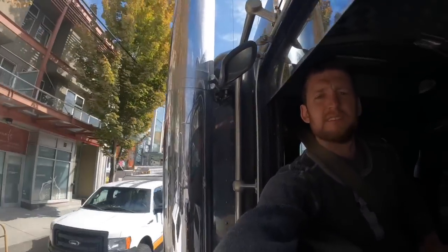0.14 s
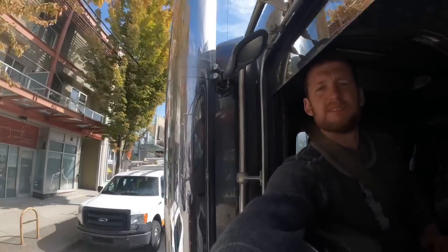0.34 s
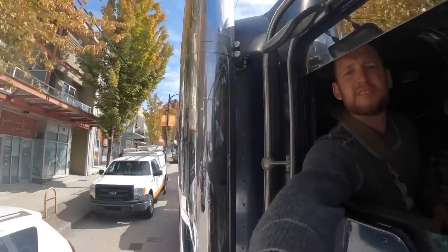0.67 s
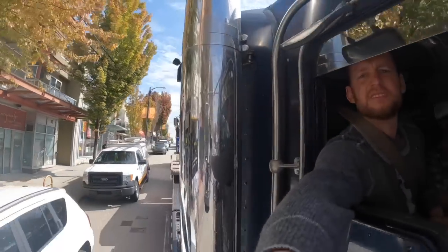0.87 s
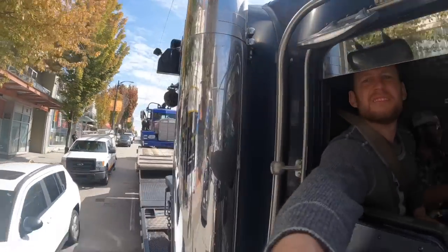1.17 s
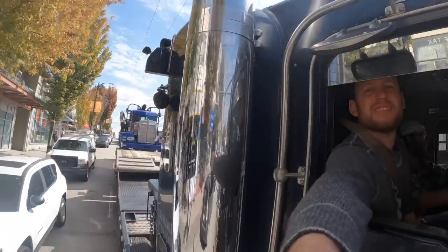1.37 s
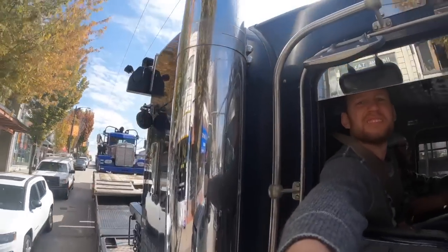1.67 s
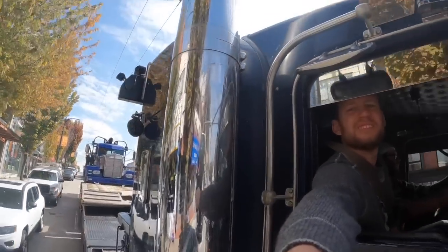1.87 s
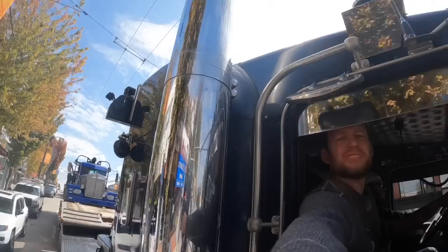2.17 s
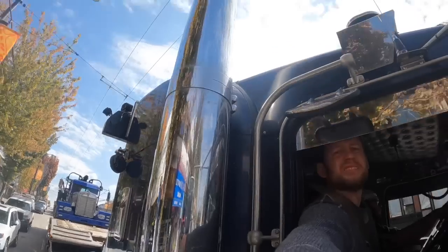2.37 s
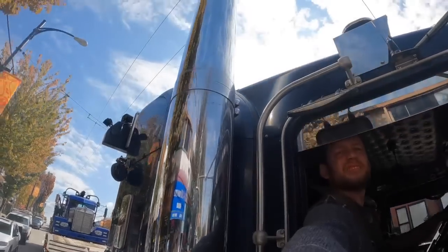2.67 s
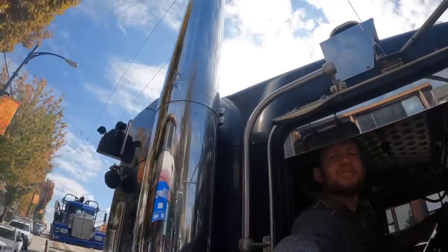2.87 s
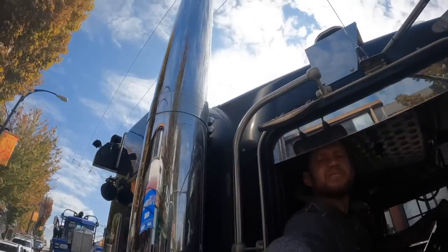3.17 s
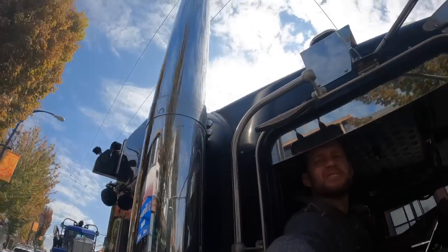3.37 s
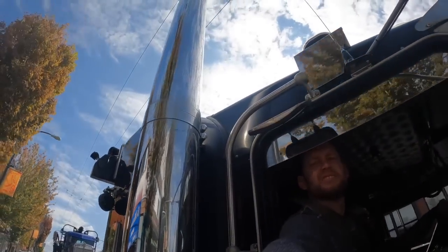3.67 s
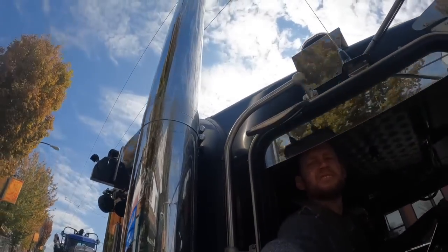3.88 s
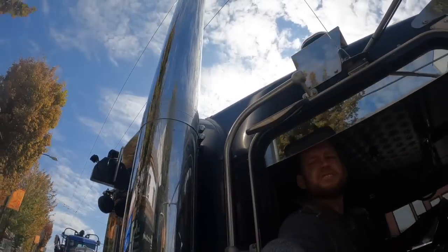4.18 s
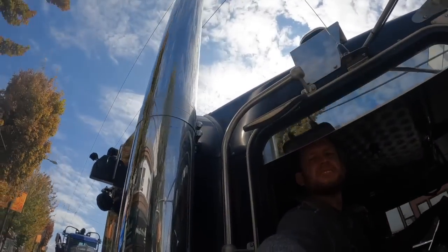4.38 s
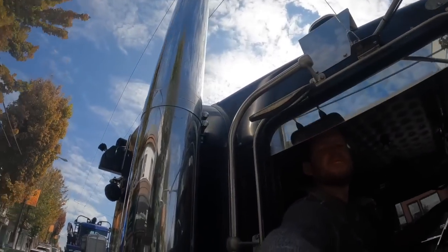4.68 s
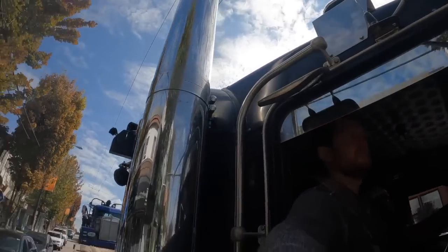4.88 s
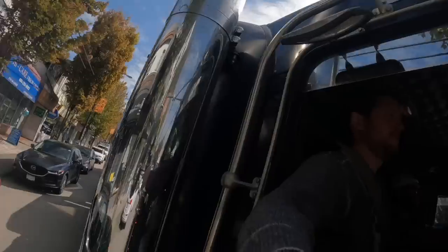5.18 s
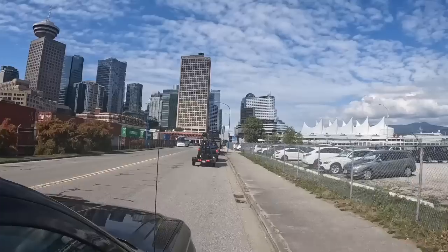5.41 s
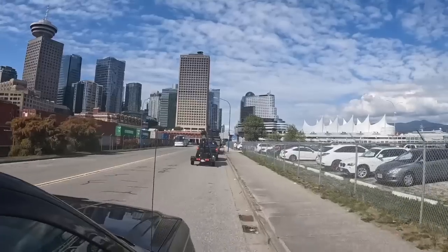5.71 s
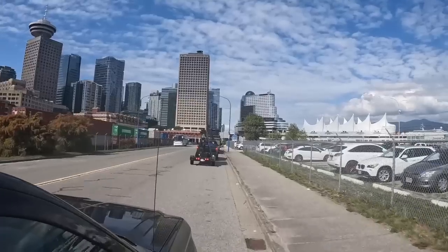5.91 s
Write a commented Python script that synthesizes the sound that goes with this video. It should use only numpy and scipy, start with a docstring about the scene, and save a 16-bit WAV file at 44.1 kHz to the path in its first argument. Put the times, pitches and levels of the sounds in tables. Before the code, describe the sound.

Close at the exhaust pipe, a heavy truck rattles out harsh brake barks around a deep accelerating roar, before an abrupt quiet drive.

```python
"""Diesel truck with engine brake, beside the exhaust stack

A six-cylinder truck in a city street, microphone right beside its stack. The engine brake barks, the driver
shifts and pulls with a roar and turbo hiss, then the brake barks again and lets go. Pulses timed by the
crankshaft ring filters for note and cracks; filtered noise makes gas and wind; sines make pipe lines, fan and turbo.
At 5.38 s the scene cuts to a much quieter drive: a muffled drone of filtered noise with a few rattles."""
import sys
import numpy as np
from scipy import signal
from scipy.fft import rfft, irfft, next_fast_len
from scipy.io import wavfile
from scipy.ndimage import uniform_filter1d, minimum_filter1d

SR = 44100
rng = np.random.default_rng(int(sys.argv[2]) if len(sys.argv) > 2 else 0)


def digitize_waveform(pressure):
    """Quantize a signal to 16-bit integers and store it at the path in sys.argv[1].

    Rows of a 2-D input are taken as channels; values are limited to [-1, 1].
    """
    field = np.atleast_2d(pressure).T
    bounded = np.clip(field, -1, 1)
    quanta = np.round(bounded * 32767).astype(np.int16)
    wavfile.write(sys.argv[1], SR, quanta)


N = 266791
T = np.arange(N) / SR  # seconds
SIZE = next_fast_len(N + SR)  # FFT length, with a second of room for tails
HZ = np.maximum(np.arange(SIZE // 2 + 1) * SR / SIZE, 1)
CYLINDERS = 6


def undb(db):
    """Decibels to gain."""
    return 10 ** (np.asarray(db) / 20)


def curves(table):
    """Each column of a table of (s, ..) rows, sample by sample."""
    s, *columns = np.transpose(table)
    return [np.interp(T, s, c) for c in columns]


def colour(points):
    """The dB of a spectrum at every frequency, drawn straight over log frequency."""
    hz, db = np.transpose(points)
    return np.interp(np.log(HZ), np.log(hz), db)


def shape(x, db):
    """Causal (minimum-phase) filter with the given dB response; the result has rms 1."""
    cepstrum = irfft(np.log(undb(db)), SIZE)
    cepstrum[1:SIZE // 2] *= 2
    cepstrum[SIZE // 2 + 1:] = 0
    response = np.exp(rfft(cepstrum))
    y = irfft(rfft(x, SIZE) * response, SIZE)[..., :N]
    return y / np.std(y)


def steady(x):
    """Hold the rms near 1 over a few engine cycles."""
    size = SR // 7
    power = uniform_filter1d(uniform_filter1d(x ** 2, size), size)
    return x / np.sqrt(power + 1e-9)


def walk(rate):
    """Smooth random wander with a spread a little under 1, taking a new value `rate` times a second."""
    k = max(int(SR / rate), 1)
    steps = np.repeat(rng.standard_normal(N // k + 1), k)
    return 0.96 * uniform_filter1d(steps, k)[:N]


def air(width=0):
    """White noise for both ears; width scales the part that differs between them."""
    mid, side = rng.standard_normal((2, N))
    return mid + width * np.array([side, -side])


def train(at, gain):
    """Single pulses at the given samples."""
    return np.bincount(at, gain, N)[:N]


def disperse(x, hz):
    """The treble leaves the pipe first, as a dip; the bass follows as a hump (an allpass)."""
    return irfft(rfft(x, SIZE) * (hz - 1j * HZ) / (hz + 1j * HZ), SIZE)[:N]


def held(on_s, off_s, attack_s, release_s):
    """A control that rises to 1 from on_s, holds, and falls back to 0 from off_s."""
    rise = np.clip((T - on_s) / attack_s, 0, 1)
    return rise * np.clip(1 - (T - off_s) / release_s, 0, 1)


# Muffled sound inside the quiet drive. Each row: frequency in Hz, relative level in dB.
CAB_COLOUR = [(25, -19), (50, -14), (125, -4), (170, 1), (215, -7), (275, 2), (440, -12.5), (1050, -16.5),
              (1800, -24), (4000, -32.5), (5500, -42), (7000, -50.5), (9000, -63), (14000, -67)]
CAB_DB = -28.5
# Loose fittings close by. Each row: start in seconds, level in dB before rattle_db, centre frequency in Hz.
RATTLES = [(5.4964, -32, 1110), (5.592, -25, 1100), (5.596, -25, 1330), (5.627, -27, 1170),
           (5.633, -28, 1590), (5.64, -24, 1590), (5.832, -19.5, 1140), (5.835, -27, 1590),
           (5.8674, -27.5, 1490), (5.978, -26.5, 1200)]


def quiet_drive(rattle_s=0.004, rattle_db=-3, rattle_slope_db=9):
    """A muffled drone of engine and road from filtered noise; loose fittings chatter in short bursts."""
    out = steady(shape(air(), colour(CAB_COLOUR))) * undb(CAB_DB)
    for s, db, hz in RATTLES:
        burst = uniform_filter1d((T >= s) * np.exp(-np.abs(T - s) / rattle_s), size=24)
        octaves = np.log2(HZ / hz)
        ring = shape(air(), -rattle_slope_db * np.minimum(octaves ** 2, 8))
        out = out + ring * burst * undb(db + rattle_db)
    return out


# Wind at the microphone near the top of the pull: start of rise in seconds, start of fall in seconds, level in dB.
GUST = (2.02, 2.5, -27)
# The gust's colour. Each row: frequency in Hz, relative level in dB.
WIND_COLOUR = [(12, -9), (28, 16), (48, 8.5), (80, -15), (200, -51)]


def gust():
    """Wind buffets the microphone: low filtered noise that rises and dies away once."""
    on_s, off_s, db = GUST
    return shape(air(), colour(WIND_COLOUR)) * held(on_s, off_s, .15, 0.3) * undb(db)


# Fan near the engine. Each row: start of rise in seconds, start of fall in seconds, level in dB.
FAN_RUNS = [(-.5, 1.3, -26.5), (1.5, 2.83, -22.5)]
FAN_ORDER = 4.8  # fan cycles per engine cycle


def cooling_fan(crank, fan_on_s=0.27, fan_off_s=0.38):
    """The fan drones as one sine geared to the engine cycle, wavering slightly in level."""
    gain = sum(held(on_s, off_s, fan_on_s, fan_off_s) * undb(db) for on_s, off_s, db in FAN_RUNS)
    tone = np.sqrt(2) * np.sin(2 * np.pi * FAN_ORDER * crank)
    return tone * gain * undb(0.43 * walk(7.5))


# The turbo's faint whistle. Each row: time in seconds, centre pitch in Hz, peak level in dB.
TURBO = [(0, 13800, -88), (.35, 13750, -72.5), (.9, 13260, -73), (1.3, 12500, -93), (4.1, 13700, -95),
         (4.3, 13650, -79), (5.12, 13700, -75), (5.18, 13100, -61), (5.3, 12000, -66), (5.38, 11400, -76)]


def turbo_whistle():
    """The turbo whistles as a gliding sine, roughened by rapid small changes of pitch."""
    turbo_hz, turbo_db = curves(TURBO)
    rough_hz = turbo_hz * (1 + .014 * walk(900))
    return np.sin(2 * np.pi * np.cumsum(rough_hz) / SR) * undb(turbo_db)


# Braking beside the stack. Each row: start of brake in seconds, start of release in seconds, second stage
# coming in from (seconds), dB added to the note, dB added to the cracks.
BRAKES = [(-.3, 0.994, 0.025, 0, -0.9), (2.805, 5.128, 3.5, 1.06, -2.6)]
BRAKE_ON_S, BRAKE_OFF_S = 0.057, 0.073  # time to rise and to let go
PULL_FROM_S, PULL_TO_S, PEDAL_DOWN_S, PEDAL_UP_S = 1.33, 2.49, 0.086, 0.15
SPOOL_DOWN_S = 1  # run-down of the boost
VENT_S, VENT_FALL_S = 3.1, 0.02  # the boost is dumped: when, how fast


def driver(bite_s=.14):
    """Controls (0-1) for brake, first stage, throttle and boost, and dB each braking adds to note and cracks."""
    holds = [held(on_s, off_s, BRAKE_ON_S, BRAKE_OFF_S) for on_s, off_s, *_ in BRAKES]
    brake = sum(holds)
    first_stage = sum(hold * np.clip(1 - (T - stage_s) / bite_s, 0, 1)
                      for hold, (_, _, stage_s, *_) in zip(holds, BRAKES))
    note_db, cracks_db = np.array(BRAKES)[:, 3:].T @ np.array(holds)
    throttle = held(PULL_FROM_S, PULL_TO_S, PEDAL_DOWN_S, PEDAL_UP_S)
    # boost builds all through the pull, then runs down until it is vented
    boost = held(PULL_FROM_S, PULL_TO_S, PULL_TO_S - PULL_FROM_S, SPOOL_DOWN_S)
    boost = boost * np.clip(1 - (T - VENT_S) / VENT_FALL_S, 0, 1)
    return brake, first_stage, throttle, boost, note_db, cracks_db


# Standing waves of the stack; negative levels cancel. Each row: frequency in Hz, width in Hz, level in dB.
STACK = [(58, 110, 7.5), (139, 16.2, -16), (154.5, 22.2, 16), (218.9, 22, 14.5), (256.4, 23.5, 9.5),
         (315.3, 28, 12.5), (336.2, 13.4, -10.5), (417.7, 32, 9.5), (470, 34, 6.5)]


def stack_db():
    """The exhaust stack's response in dB: its standing waves lift some bands and cancel others."""
    return sum(db / (1 + (2 * (HZ - hz) / width) ** 2) for hz, width, db in STACK)


def puffs(crank, depth, throb):
    """Gas flow swells after each firing and throbs once a cycle; the gate has rms 1."""
    each_firing = depth * np.cos(2 * np.pi * (CYLINDERS * crank - .15))
    each_cycle = throb * np.cos(2 * np.pi * (crank + 0.071))
    gate = np.exp(each_firing + each_cycle)
    return gate / np.sqrt(np.mean(gate ** 2))


# Colour of the high gas hiss. Each row: frequency in Hz, relative level in dB.
HISS_COLOUR = [(1200, -7), (2800, 4.5), (4300, -2.5), (5000, -5), (5600, -5), (7200, -12.5), (8600, -22.5),
               (11000, -27.5), (12200, -25), (14500, -39)]
# Level while coasting, and dB each control adds.
HISS_DB, HISS_BRAKE_DB, HISS_THROTTLE_DB, HISS_BOOST_DB = -48.5, -3, 4, 8


def gas_hiss(crank, width, brake, throttle, boost):
    """Fast gas hisses as bright noise that grows with the square of the boost and flutters in level."""
    db = HISS_DB + HISS_BRAKE_DB * brake + HISS_THROTTLE_DB * throttle + HISS_BOOST_DB * boost ** 2
    noise = shape(air(width), colour(HISS_COLOUR))
    return noise * puffs(crank, depth=0.083, throb=0.13) * undb(db + 1.3 * walk(22))


# Colour of the gas roar. Each row: frequency in Hz, relative level in dB.
ROAR_COLOUR = [(250, -18.5), (480, 2.5), (750, 3.5), (1200, -0.5), (1800, -9), (2600, -19), (4000, -31),
               (8000, -54.5)]
# Level while coasting, and dB each control adds.
ROAR_DB, ROAR_BRAKE_DB, ROAR_THROTTLE_DB, ROAR_BOOST_DB = -31, -0.5, 2.5, 6


def gas_roar(crank, width, full_brake, throttle, boost, bark_db, roar_follows_bark=0.05):
    """Gas roars as noise swelling with the boost; under the brake it leaves in cracks and less of it roars."""
    db = ROAR_DB + ROAR_BRAKE_DB * full_brake + ROAR_THROTTLE_DB * throttle + ROAR_BOOST_DB * boost
    db = db + roar_follows_bark * bark_db
    noise = shape(air(width) * puffs(crank, depth=0.025, throb=0.13), colour(ROAR_COLOUR))
    return noise * undb(db + 0.57 * walk(25.01))


# Colour of the low churn before the stack. Each row: frequency in Hz, relative level in dB.
TURBULENCE_COLOUR = [(15, -13.5), (30, -6.5), (60, 3.5), (110, 6.5), (200, 1.5), (320, 7.5), (480, -2.5),
                     (700, -1.5), (1200, -64)]
# Level while coasting, and dB each control adds.
CHURN_DB, CHURN_BRAKE_DB, CHURN_BOOST_DB, CHURN_RELEASE_DB = -20, -2, 1.5, 7


def stack_turbulence(crank, width, full_brake, boost, chuff_s=0.13):
    """Gas churns in the stack as low noise, with a chuff each time the brake lets go."""
    chuff = sum(held(off_s - BRAKE_OFF_S, off_s, BRAKE_OFF_S, chuff_s) for _, off_s, *_ in BRAKES)
    db = CHURN_DB + CHURN_BRAKE_DB * full_brake + CHURN_BOOST_DB * boost + CHURN_RELEASE_DB * chuff
    flow = air(.25 * width) * puffs(crank, depth=0.18, throb=0.037)
    return shape(flow, colour(TURBULENCE_COLOUR) + 0.41 * stack_db()) * undb(db)


# Firing rates in Hz between which the low, middle and high rev settings blend.
REVS_HZ = [70, 79, 87]
# Clean lines of the pipe, as multiples of the engine cycle.
SINGING_ORDERS = [12, 21, 27, 30, 33, 42, 48]
# One row per line: level braking at low revs, braking at higher revs, pulling, all in dB before SINGING_DB.
SINGING = [(-51.5, -29, -24.5), (-28, -30, -27), (-33.5, -29, -35), (-36, -42.5, -50), (-50, -38.5, -51),
           (-32.5, -47.5, -56), (-38, -42, -53.5)]
SINGING_DB = -2.5


def singing_pipe(crank, firing_hz, full_brake, throttle, waver_db=2.0):
    """The steady beat of the firings makes the pipe sing in clean lines that glide with the revs."""
    revs = np.interp(firing_hz, REVS_HZ[:2], [0, 1])
    out = 0
    for order, (low_db, high_db, pull_db) in zip(SINGING_ORDERS, SINGING):
        gain = full_brake * undb(low_db + (high_db - low_db) * revs) + throttle * undb(pull_db)
        line = np.sqrt(2) * np.sin(2 * np.pi * order * crank)
        out = out + line * gain * undb(waver_db * walk(7.6))
    return out * undb(SINGING_DB)


# Colour of the gas puff at the loudest crack. Each row: frequency in Hz, relative level in dB.
SPIT_COLOUR = [(300, -12.5), (600, 1), (1200, -4.5), (2200, -10.5), (2900, -26.5), (6000, -51)]
SPIT_DB, SPIT_S = -27, .004  # level before softening; time from peak to 1/e


def valve_spit(crank, firing_hz, brake, bark_db):
    """The loudest valve spits a short puff of gas, a burst of noise, with its crack once a cycle."""
    from_crack_s = ((crank + .5) % 1 - .5) * CYLINDERS / firing_hz
    puff = np.exp(-(from_crack_s / SPIT_S) ** 2)
    return shape(air(), colour(SPIT_COLOUR)) * puff * brake * undb(SPIT_DB + bark_db)


# Valves cracking under the brake. Each row: place in the cycle in firings, relative level in dB at low revs,
# relative level in dB at higher revs.
CRACKS = [(-.05, 0, -3), (.42, -20.5, -7.5), (1, -2, -13.5), (2.019, -3, -8.5), (2.999, -15.5, -12.5),
          (3.981, -2, -4.5), (4.951, -16, -13)]
# Colours of a crack's body and of its bright snap. Each row: frequency in Hz, relative level in dB.
CRACK_COLOUR = [(120, -21), (300, -10), (480, -1.5), (700, 12), (1000, -0.5), (1500, -22), (2200, -49.5),
                (3200, -59.5), (6000, -79)]
SNAP_COLOUR = [(300, 1), (700, 10), (1100, -1), (1600, -7.5), (2250, -18), (2900, -29), (6000, -58)]
CRACKS_DB = -24.5


def brake_cracks(crank, firing_hz, bark_db, body_db=-8, snap_follows_bark=0.17):
    """Cylinders dump compressed air in sharp cracks, whose balance over the cycle shifts with the revs."""
    revs = np.interp(firing_hz, REVS_HZ[:2], [0, 1])
    pulses = 0
    for place, low_db, high_db in CRACKS:
        at = np.flatnonzero(np.diff(np.floor(crank - place / CYLINDERS)))
        pulses = pulses + train(at, undb(low_db + (high_db - low_db) * revs[at]))
    body = shape(-pulses, colour(CRACK_COLOUR))
    # the hardest blows steepen into a bright snap on their way up the pipe
    snap = shape(-pulses ** 2, colour(SNAP_COLOUR))
    return steady(undb(body_db) * body + undb(snap_follows_bark * bark_db) * snap)


# Unequal blows of the six cylinders in firing order: braking at low, middle and high revs, under the first
# stage with only some cylinders braking, and pulling or coasting. Each row: relative level in dB, lateness in ms.
BRAKE_LOW_BLOWS = [(-1, 1.31), (-5.5, -1.6), (-11, -1.2), (-1, -1.6), (-3.5, -1.6), (0.9, -1.1)]
BRAKE_MID_BLOWS = [(-1.4, 0.76), (-4.5, -1.2), (0, -2), (-2.5, -1.15), (-14, -1.2), (0.5, -1.12)]
BRAKE_HIGH_BLOWS = [(-0.8, -0.73), (-7, -0.37), (-11.5, -0.73), (-3.2, -1.45), (-4.5, -0.99), (-2.7, -1.3)]
FIRST_STAGE_BLOWS = [(-2.2, -0.5), (-5.5, -0.97), (-6, -2), (-3.9, -1.1), (-2.2, -.4), (-9.5, -0.1)]
PULL_BLOWS = [(-2.7, -1.03), (-2.8, -1.77), (-2.1, -0.97), (-4.5, -0.55), (-1.5, -1.54), (-6, -0.92)]


def firings(crank, firing_hz, brake, first_stage, coasting, scatter_db=-0.47, coast_scatter_db=3.5,
            jitter_ms=0.024, coast_jitter_ms=1.0):
    """Sample, cylinder and strength of every exhaust blow: steady under load, ragged when coasting."""
    count = np.floor(crank * CYLINDERS).astype(int)
    at = 1 + np.flatnonzero(np.diff(count))
    cylinder = count[at] % CYLINDERS
    full_brake = brake - first_stage
    low, mid, high = (full_brake * np.interp(firing_hz, REVS_HZ, share) for share in np.eye(len(REVS_HZ)))
    states = ((low, BRAKE_LOW_BLOWS), (mid, BRAKE_MID_BLOWS), (high, BRAKE_HIGH_BLOWS),
              (first_stage, FIRST_STAGE_BLOWS), (1 - brake, PULL_BLOWS))
    db, late_ms = sum(share[at] * np.array(table)[cylinder].T for share, table in states)
    swell, slip = rng.standard_normal((len(at), 2)).T
    db = db + (scatter_db + coast_scatter_db * coasting[at]) * swell
    late_ms = late_ms + (jitter_ms + coast_jitter_ms * coasting[at]) * slip
    at = at + np.round(late_ms * SR / 1000).astype(int)
    return np.clip(at, 0, N - 1), cylinder, undb(db)


BRANCH_ECHO_S, BRANCH_ECHO_DB = .0038, -10


def manifold(at, cylinder, strength):
    """The blows as pulses; every second one comes through the manifold's far branch, which echoes it."""
    echo_at = np.minimum(at + int(BRANCH_ECHO_S * SR), N - 1)
    return train(at, strength) + undb(BRANCH_ECHO_DB) * train(echo_at, strength * (cylinder % 2))


# One exhaust blow before the stack, braking and pulling. Each row: frequency in Hz, relative level in dB.
BRAKE_NOTE = [(15, -17), (30, -9), (60, 2.7), (100, 12.5), (160, 17.5), (250, 6.5), (350, 11.5),
              (500, -1.5), (800, -8), (1500, -37.5), (3000, -67), (8000, -86)]
PULL_NOTE = [(15, -7), (30, 5.5), (60, 13.5), (100, 18), (160, 13.4), (250, 1.2), (350, 10.5), (500, -16),
             (800, -17.5), (1500, -33.5), (3000, -51.5), (8000, -78.5)]
# The first stage's honk: frequency in Hz, width in Hz, relative level in dB.
HONK = (247, 71, -8)


def exhaust_note(blows, brake, first_stage, brake_turn_hz=307, pull_turn_hz=825,
                 first_stage_open=0.071, first_stage_db=-2):
    """Every blow rings the stack: hard and hollow under the brake, round and deep when pulling."""
    stack = stack_db()
    braking = steady(shape(disperse(blows, brake_turn_hz), colour(BRAKE_NOTE) + stack))
    pulling = steady(shape(disperse(blows, pull_turn_hz), colour(PULL_NOTE) + stack))
    # the first stage keeps some of the open colour, is a little quieter and honks in one more resonance
    share = brake - first_stage_open * first_stage
    honk_hz, honk_width_hz, honk_db = HONK
    resonance_db = -20 * np.log10(1 + (2 * (HZ - honk_hz) / honk_width_hz) ** 2)
    honk = steady(shape(blows, resonance_db))
    mix = share * braking + (1 - share) * pulling + first_stage * undb(honk_db) * honk
    return steady(mix) * undb(first_stage_db * first_stage)


# Engine speed. Each row: time in seconds, firing rate in Hz.
SPEED = [(0.0, 71.08), (0.25, 70.29), (0.5, 67.81), (0.8, 66.01), (1.0, 62.35), (1.15, 53.1), (1.28, 53.34),
         (1.45, 73.69), (1.7, 90.51), (1.95, 89.98), (2.2, 90.03), (2.45, 96.72), (2.72, 76.49),
         (2.9, 94.15), (3.15, 94.16), (3.3, 91.76), (3.45, 88.21), (3.7, 90.09), (4.0, 85.39),
         (4.35, 83.66), (4.7, 80.1), (5.1, 77.48)]
# The rush of air spreads between the ears near the top of the pull. Each row: time in seconds, width from 0 to 1.
WIDTH = [(1.9, 0), (2.4, 0.35), (2.65, 0.6), (2.9, 0)]
# The brake barks hardest at low revs; above BARK_HZ it softens with the square of the excess.
BARK_HZ, BARK_SOFTEN_DB_PER_HZ2 = 82.44, 0.76
# Note level while coasting, and dB each control adds.
NOTE_DB, NOTE_BRAKE_DB, NOTE_THROTTLE_DB = -21.5, 9.5, 8


def truck():
    """Firing rate sums to a crank angle that times note, cracks, gas and fan; whistle and gust join in."""
    firing_hz, = curves(SPEED)
    crank = np.cumsum(firing_hz) / SR / CYLINDERS - .238  # engine cycles
    width, = curves(WIDTH)
    brake, first_stage, throttle, boost, note_db, cracks_db = driver()
    full_brake = brake - first_stage
    coasting = np.clip(1 - brake - throttle, 0, 1)
    bark_db = -BARK_SOFTEN_DB_PER_HZ2 * np.maximum(firing_hz - BARK_HZ, 0) ** 2 * brake

    background = gust() + cooling_fan(crank) + turbo_whistle()
    gas = gas_hiss(crank, width, brake, throttle, boost)
    gas = gas + gas_roar(crank, width, full_brake, throttle, boost, bark_db)
    gas = gas + stack_turbulence(crank, width, full_brake, boost)
    lines = singing_pipe(crank, firing_hz, full_brake, throttle)
    spit = valve_spit(crank, firing_hz, brake, bark_db)
    cracks = brake_cracks(crank, firing_hz, bark_db) * brake * undb(CRACKS_DB + bark_db + cracks_db)
    blows = manifold(*firings(crank, firing_hz, brake, first_stage, coasting))
    note_level_db = NOTE_DB + NOTE_BRAKE_DB * brake + NOTE_THROTTLE_DB * throttle + note_db
    note = exhaust_note(blows, brake, first_stage) * undb(note_level_db)
    return background + gas + lines + spit + cracks + note


CUT_S = 5.38


def scene():
    """The truck, then a hard cut to the quiet drive."""
    after = uniform_filter1d((T > CUT_S) * 1., size=128)
    return truck() * (1 - after) + quiet_drive() * after


TOP_HZ = 15100


def record(dry):
    """A limiter holds the tallest peaks; the top is cut."""
    need = np.minimum(1, .92 / (np.abs(dry).max(axis=0) + 1e-9))
    # look around each peak, then smooth the gain
    gain = minimum_filter1d(need, size=801)
    gain = uniform_filter1d(uniform_filter1d(gain, size=401), size=401)
    lowpass = signal.ellip(8, .2, 70, TOP_HZ, fs=SR, output="sos")
    return signal.sosfilt(lowpass, dry * gain)


dry = scene()
out = record(dry)
digitize_waveform(out)
```